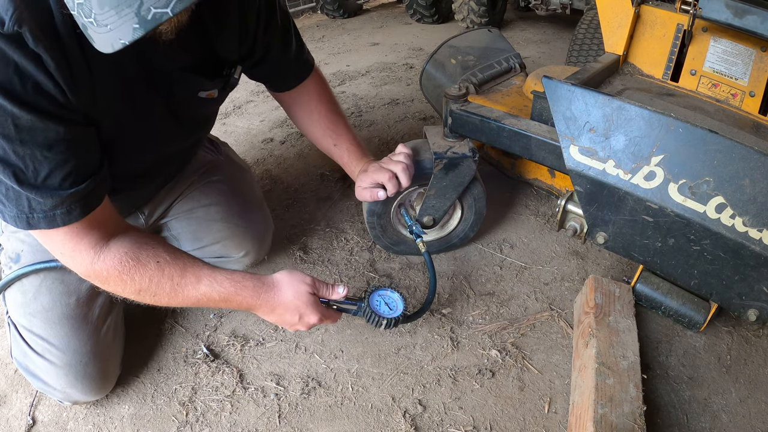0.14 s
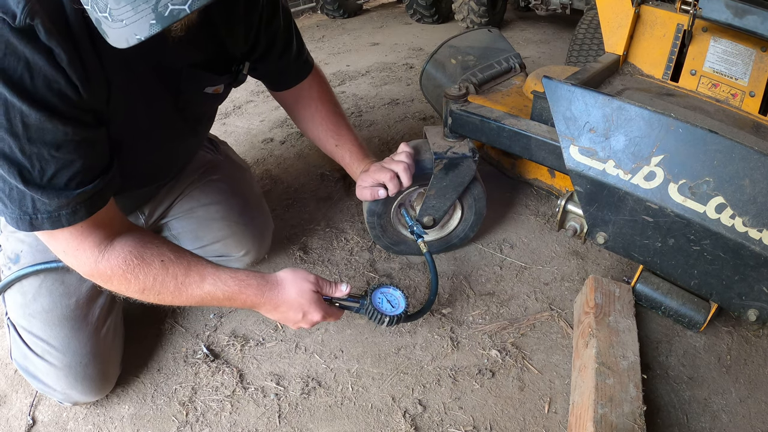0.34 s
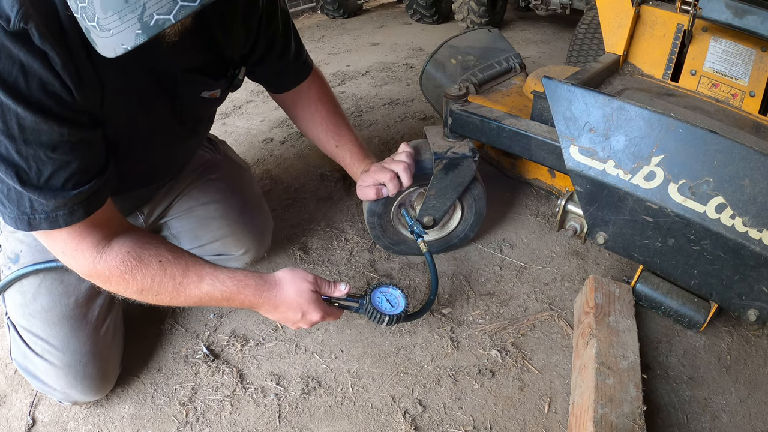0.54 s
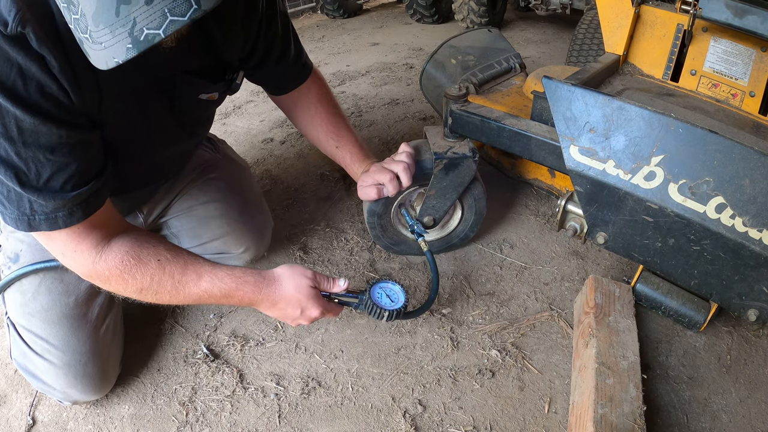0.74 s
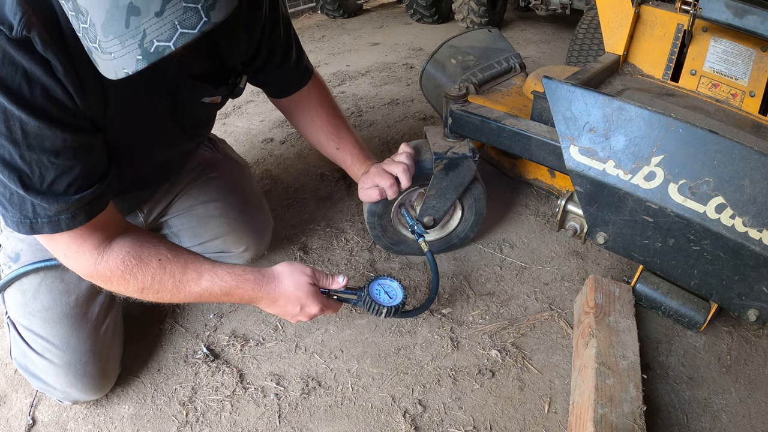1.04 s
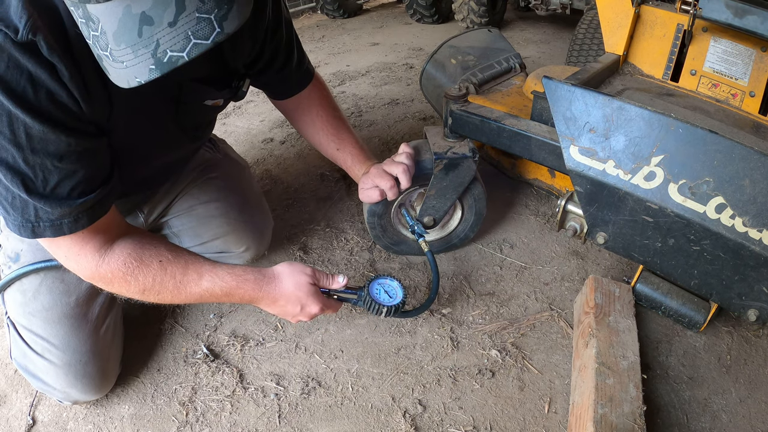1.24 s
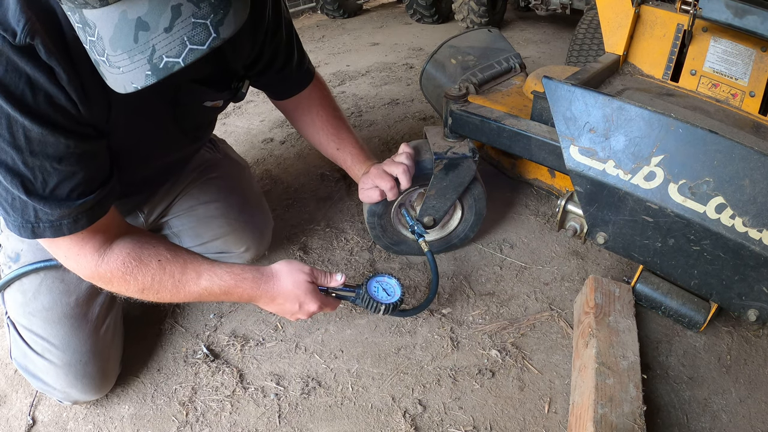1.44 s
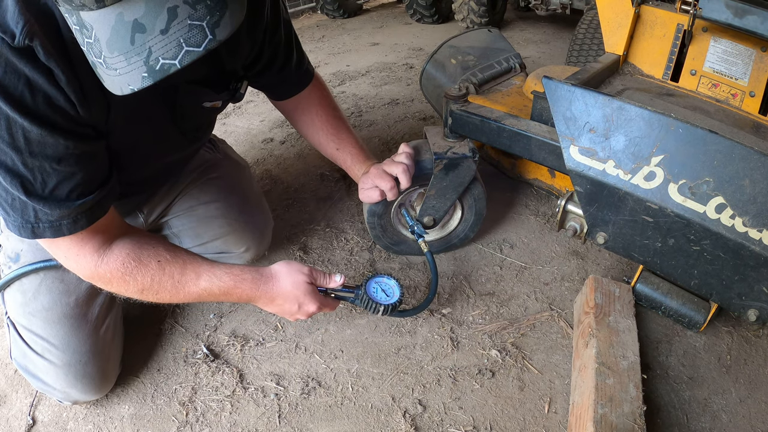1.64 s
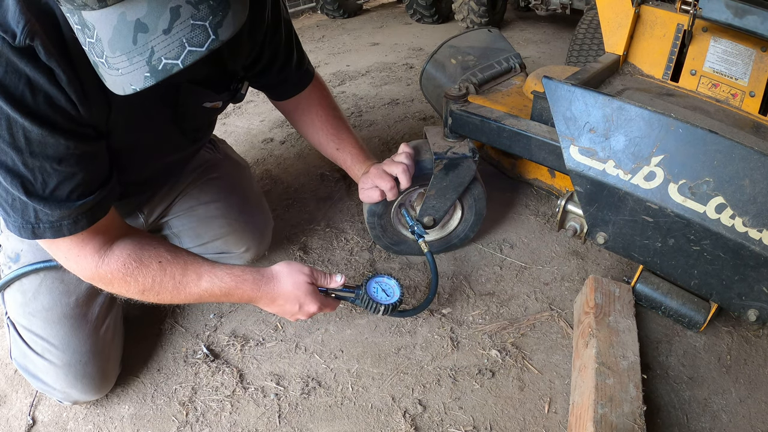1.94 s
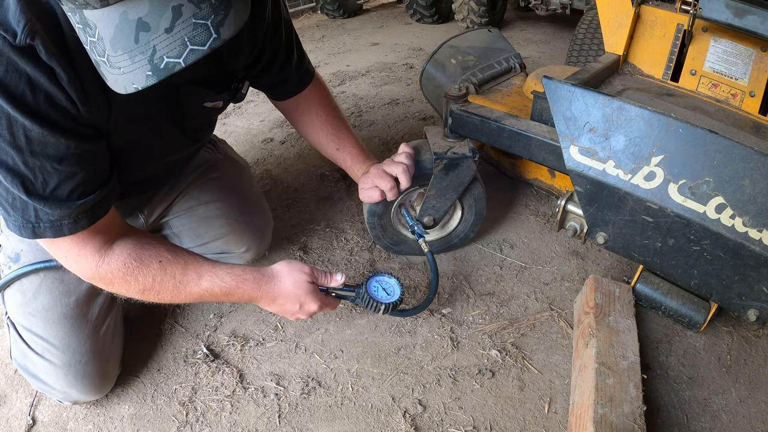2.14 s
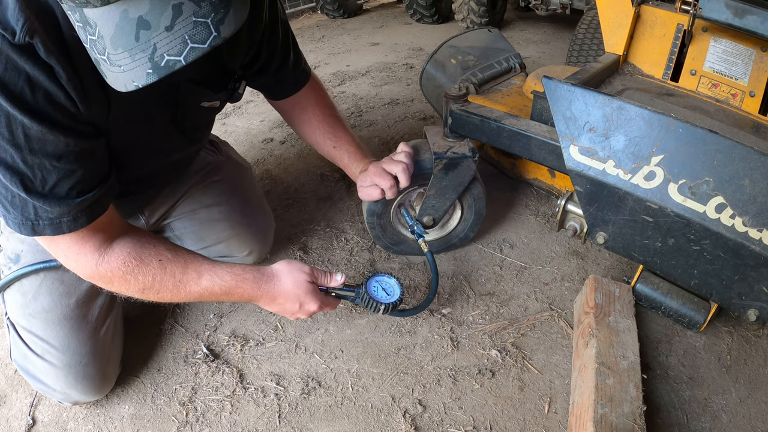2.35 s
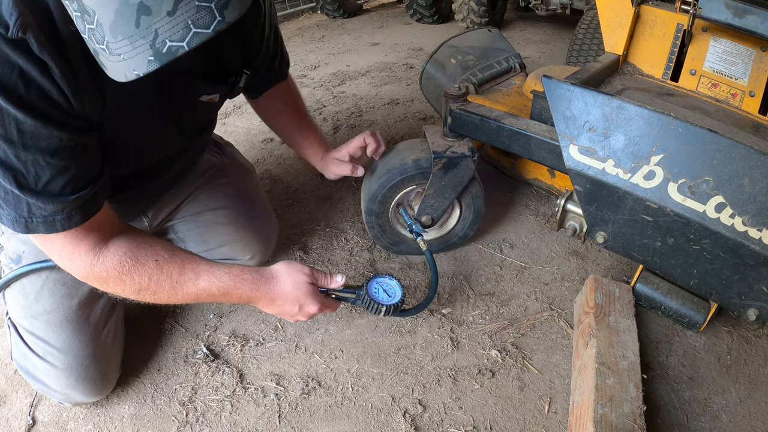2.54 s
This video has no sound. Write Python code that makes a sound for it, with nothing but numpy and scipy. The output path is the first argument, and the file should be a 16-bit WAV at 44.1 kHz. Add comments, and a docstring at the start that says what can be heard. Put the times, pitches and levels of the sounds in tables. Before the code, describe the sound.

Compressed air rushes through a hose and chuck into a small tire, a close, harsh, bright hiss running throughout without a break. Soft low bumps flurry in the first 0.12 seconds, with fainter ones near 0.3 and 1.3. Around 1 second the whistling, ringing colour shifts as the tire firms. At about 2.6 seconds the hiss abruptly turns broader and more open. Faint rumble and yard noise lie beneath.

```python
"""Inflating a small mower tire

Compressed air rushes through an inflator and chuck into the tire, close to the microphone: shaped noise
hisses and rings hose, valve and tire, and the resonances change weight as the tire fills.
Near the end the steadying hand lifts off and the hiss opens up.
Soft low pulses bump in a flurry at the start and twice more later, over faint rumble and yard noise.
"""
import sys
import numpy as np
from scipy import signal
from scipy.io import wavfile

SR = 44100
rng = np.random.default_rng(int(sys.argv[2]) if len(sys.argv) > 2 else 0)


def inscribe(sig):
    """Save sig as 16-bit PCM at rate SR to the path in sys.argv[1].

    A 1-D sig is mono; a 2-D sig holds one channel per row.
    Samples are clipped to [-1, 1] before scaling.
    """
    pcm = np.round(np.clip(np.atleast_2d(sig).T, -1, 1) * 32767)
    wavfile.write(sys.argv[1], SR, pcm.astype(np.int16))


N = 119070  # length in samples

# Broad hiss of the jet with the hand on the tire, before flow and flutter.
# Each row: frequency in Hz, level in dB per Hz.
JET_HISS = [(20, -98), (100, -81), (310, -75), (490, -73), (620, -77.5), (780, -82), (960, -79),
            (1140, -86), (1400, -83), (2130, -80.5), (2600, -96), (2950, -83), (3400, -82.5), (3680, -72.5),
            (4250, -71.5), (4700, -69), (6000, -72.5), (6500, -67.5), (7700, -66.5), (10900, -67.5),
            (11400, -64.5), (13100, -66), (14100, -67), (15000, -75.5), (15700, -83)]
# Resonances of the air path through hose, valve and tire.
# Each row: frequency in Hz, width in Hz, level in dB per Hz with the tire slack, the same with it firm.
AIR_PATH_RESONANCES = [(1235, 53, -71, -74), (1310, 76, -80, -76), (2323, 89, -77, -74.5),
                       (2444, 22, -66, -74), (2590, 37, -64.5, -64), (2610, 170, -72.5, -74),
                       (2815, 49, -59.5, -59.5), (3050, 46, -65.5, -67.5), (3280, 45, -68, -67.5),
                       (3539, 80, -74, -62.5), (4040, 50, -58, -55.5), (4360, 320, -73, -66.5),
                       (4530, 55, -55, -63.5), (4660, 79, -66, -59.5), (4918, 56, -56.5, -57),
                       (5080, 53, -60, -55.5), (5320, 35, -65, -63), (5234, 74, -53.5, -54),
                       (5460, 100, -56.5, -76), (5622, 34, -52.5, -51.5), (5726, 61, -75, -53.5),
                       (5966, 140, -56, -62), (6117, 95, -58, -55.5), (6298, 63, -57.5, -51),
                       (6605, 68, -58, -56), (6650, 75, -59, -63), (6870, 51, -63, -59),
                       (7150, 89, -61, -68), (8800, 61, -80, -62), (10290, 46, -56.5, -55.5),
                       (11000, 70, -61, -64), (11500, 73, -65, -60), (12120, 60, -55.5, -64),
                       (12300, 80, -72, -64), (12690, 70, -74, -73), (12870, 72, -71, -56.5),
                       (14100, 80, -67, -66), (14280, 80, -76, -71), (14700, 120, -80, -62)]
# Broad hiss with the hand lifted. Each row: frequency in Hz, level in dB per Hz.
FREED_HISS = [(20, -80), (150, -71), (500, -70), (750, -74.5), (1250, -75), (2000, -82), (3300, -77),
              (4300, -68), (4900, -61), (6900, -61), (7700, -65), (8900, -65), (9500, -61), (10500, -60.5),
              (13400, -58.5), (14600, -63), (15500, -72)]
# Resonances of the freed tire. Each row: frequency in Hz, width in Hz, level in dB per Hz.
FREED_RESONANCES = [(2610, 190, -64), (3000, 47, -58), (3510, 57, -56.5), (4020, 170, -65),
                    (4700, 67, -51.5), (5250, 60, -55), (5540, 140, -54), (6500, 75, -61),
                    (13100, 150, -56), (13500, 200, -51)]
# Air flow, heard as the level of the whole hiss. Each row: time in seconds, level change in dB.
AIR_FLOW = [(0, -.5), (.12, -0.8), (.28, -1.8), (.31, -0.5), (.38, -0.7), (.6, -0.5), (.95, -1.06),
            (1.1, 0.3), (1.28, 0.5), (1.45, 0.45), (1.65, 0.5), (2, 0.7), (2.15, 0.66), (2.35, 0.1),
            (2.49, 0), (2.55, 0.5), (2.62, 0.4), (2.7, 1)]
# Fizz, the top treble of the hiss. Each row: time in seconds, level change in dB.
TREBLE_FIZZ = [(0, -1.5), (.12, 3), (.25, 1.5), (.45, 2), (.65, 1), (1.2, -1), (1.9, -3), (2.2, -1.6),
               (2.7, -1.5)]
# Faint low rumble. Each row: frequency in Hz, level in dB per Hz.
LOW_RUMBLE = [(10, -72), (30, -79.5), (60, -77), (100, -91.5), (200, -105), (1000, -140)]
# Faint diffuse yard noise. Each row: frequency in Hz, level in dB per Hz.
YARD_NOISE = [(20, -96), (100, -93.5), (200, -96), (550, -101.5), (1100, -99), (2000, -112), (8000, -125)]
# Soft low bumps at the microphone.
# Each row: centre in seconds, time scale in seconds, level in dB (the peak lies 1.3 dB lower).
SOFT_BUMPS = [(0.038, 0.005, -32), (0.059, 0.0048, -30), (0.07, 0.0069, -22), (0.115, .014, -36),
              (.33, 0.0079, -46), (1.284, .008, -41)]

FIRM_S, FIRM_SPAN_S = 0.98, 0.18  # when the tire firms up, and how gradually
LIFT_S, LIFT_SPAN_S = 2.61, 0.013  # when the hand lifts, and how gradually
FIZZ_HZ, FIZZ_SPAN_HZ = 11000, 1500  # where the fizz band begins, and how gradually
# Drifting random ripple in the hiss's colour: rms depth at the top, smoothing across pitch and time
RIPPLE_DB, RIPPLE_HZ, RIPPLE_S = 3, 40, 0.62
# Turbulent flutter: rms depth, smoothing across pitch and time
FLUTTER_DB, FLUTTER_HZ, FLUTTER_S = 1.0, 673, 0.038
EDGE_HZ = 15740  # top of the recorder's band
SIZE, HOP = 2048, 256  # spectral frame and step, in samples
HZ = np.fft.rfftfreq(SIZE, 1 / SR)
TIMES = np.arange(N // HOP + 3) * HOP / SR  # frame times in seconds


def amp(db):
    """Decibels to gain."""
    return 10 ** (np.asarray(db) / 20)


def read_spectrum(points, hz):
    """Levels in dB joined by straight lines on a log-frequency axis."""
    point_hz, level_db = np.transpose(points)
    return np.interp(np.log(hz + 1), np.log(point_hz + 1), level_db)


def follow(points):
    """A level curve read at each frame, as a column."""
    return np.interp(TIMES, *np.transpose(points))[:, None]


def change(at, span):
    """A smooth step in time from 0 to 1, as a column."""
    return (0.5 + 0.5 * np.tanh((TIMES - at) / (2 * span)))[:, None]


def evened(x):
    """Scales to unit rms."""
    return x / np.sqrt(np.mean(x ** 2) + 1e-20)


def patches(width_hz, length_s):
    """A random field over time and frequency, smoothed by a Gaussian along both."""
    shape = (len(TIMES), len(HZ))
    field = np.fft.rfft2(rng.standard_normal(shape))
    along_time = np.fft.fftfreq(len(TIMES), HOP / SR)[:, None]
    along_pitch = np.fft.rfftfreq(len(HZ), SR / SIZE)
    smoothing = np.exp(-2 * (along_time * length_s) ** 2 - 2 * (along_pitch * width_hz) ** 2)
    return evened(np.fft.irfft2(field * smoothing, shape))


def noise(gain):
    """White noise shaped by a frames x bins gain per root Hz."""
    white = rng.standard_normal((len(TIMES) - 1) * HOP) * np.sqrt(SR / 2)
    spectrum = signal.stft(white, nperseg=SIZE, noverlap=SIZE - HOP)[2]
    return signal.istft(spectrum * gain.T, nperseg=SIZE, noverlap=SIZE - HOP)[1][:N]


def ringing(hiss, resonances):
    """Power spectrum of the broad hiss with resonant peaks added."""
    power = amp(read_spectrum(hiss, HZ)) ** 2
    for hz, width, db in resonances:
        power = power + amp(db) ** 2 / (1 + 2 * ((HZ - hz) / width) ** 2) ** 2
    return power


def air_jet():
    """Turbulent hiss whose colour passes from slack tire to firm tire to freed tire, fluttering all along."""
    slack = ringing(JET_HISS, [(hz, width, db) for hz, width, db, _ in AIR_PATH_RESONANCES])
    firm = ringing(JET_HISS, [(hz, width, db) for hz, width, _, db in AIR_PATH_RESONANCES])
    freed = ringing(FREED_HISS, FREED_RESONANCES)

    filled = change(FIRM_S, FIRM_SPAN_S)
    lifted = change(LIFT_S, LIFT_SPAN_S)
    held = (1 - filled) * slack + filled * firm
    power = (1 - lifted) * held + lifted * freed

    top = 0.5 + 0.5 * np.tanh((HZ - FIZZ_HZ) / FIZZ_SPAN_HZ)
    ripple_share = np.minimum(0.27 + HZ / 12000, 1)  # shallower toward the bass
    ripple = RIPPLE_DB * patches(RIPPLE_HZ, RIPPLE_S) * ripple_share
    flutter = FLUTTER_DB * patches(FLUTTER_HZ, FLUTTER_S)
    level_db = follow(AIR_FLOW) + top * follow(TREBLE_FIZZ) + ripple + flutter
    return noise(np.sqrt(power) * amp(level_db))


def rumble():
    """Faint steady low noise."""
    return noise(amp(read_spectrum(LOW_RUMBLE, HZ))[None])


def yard():
    """Diffuse outdoor noise, drawn separately for each channel."""
    gain = amp(read_spectrum(YARD_NOISE, HZ))[None]
    return np.array([noise(gain) for channel in range(2)])


def bumps():
    """Each bump is one soft push and rebound of the air: the slope of a Gaussian."""
    t = np.arange(N) / SR
    out = np.zeros(N)
    for at, length, db in SOFT_BUMPS:
        u = (t - at) / length
        out -= amp(db) * 2 * u * np.exp(-u ** 2)
    return out


def scene():
    """Hiss, rumble and bumps in the centre, with the quiet yard spread across both channels."""
    return air_jet() + rumble() + yard() + bumps()


def record(dry):
    """The recorder's band limit: a steep linear-phase low-pass."""
    low_pass = signal.firwin(511, EDGE_HZ, window=("kaiser", 9), fs=SR)
    return signal.oaconvolve(dry, low_pass[None], "same")


dry = scene()
out = record(dry)
inscribe(out)
```